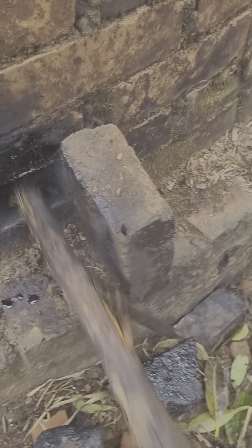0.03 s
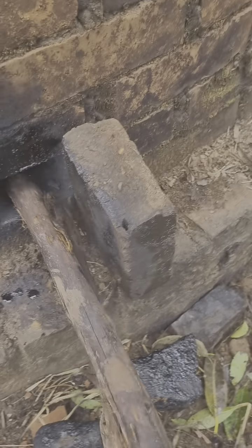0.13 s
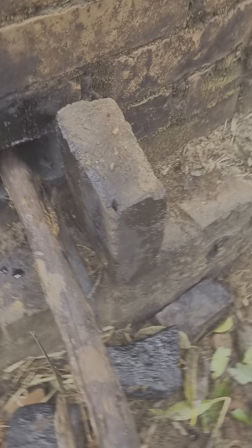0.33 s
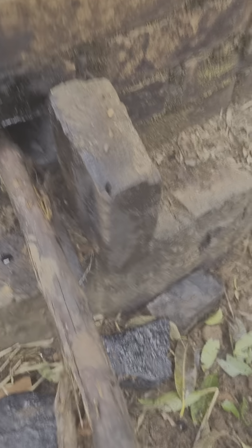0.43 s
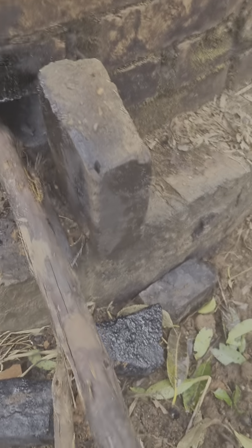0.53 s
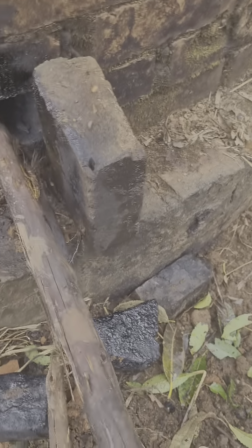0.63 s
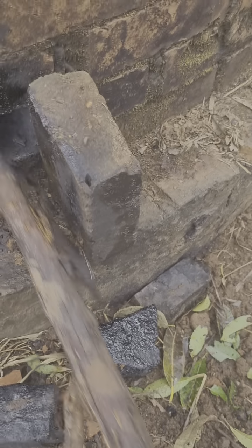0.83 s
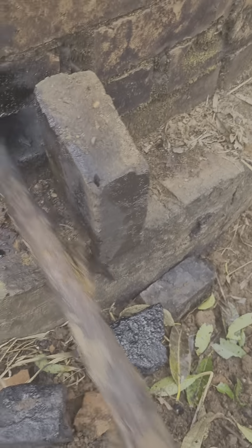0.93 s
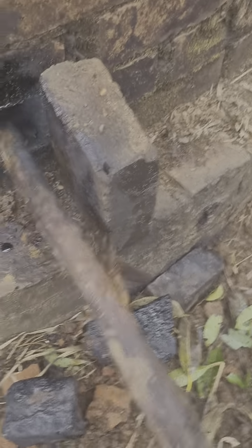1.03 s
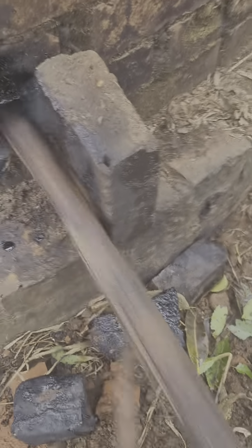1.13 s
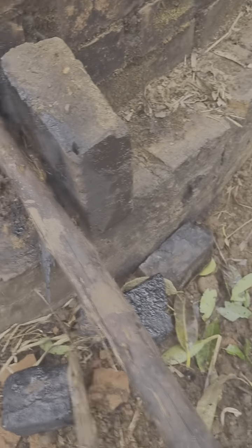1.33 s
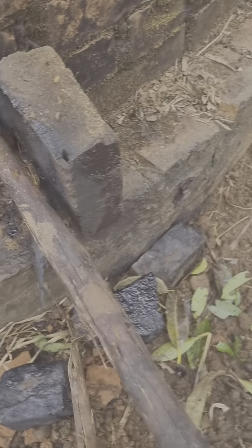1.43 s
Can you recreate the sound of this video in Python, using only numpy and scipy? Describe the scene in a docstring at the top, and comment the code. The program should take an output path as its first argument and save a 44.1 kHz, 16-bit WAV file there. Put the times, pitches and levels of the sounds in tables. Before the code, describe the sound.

A wooden pole knocks against brick twice, about a second apart, each a dry crack with a short woody ring. Its tip faintly scrapes and snaps grit around the blows, over soft handling bumps and quiet outdoor hiss.

```python
"""Two knocks of a wooden pole on brick

Each impact gives a dry crack and excites the pole's damped modes, a short woody ring; wall and ground
scatter the sound back. Around the blows the hand-held tip scrapes over the brick and snaps bits of grit.
Soft handling bumps, scuffs and a faint outdoor hiss lie underneath."""
import sys
import numpy as np
from scipy import signal
from scipy.fft import rfft, irfft
from scipy.io import wavfile
from scipy.ndimage import uniform_filter1d

SR = 44100
rng = np.random.default_rng(int(sys.argv[2]) if len(sys.argv) > 2 else 0)


def master_out(mix):
    """Clip the mix to full scale and print it as 16-bit PCM to the path in sys.argv[1]."""
    frames = np.transpose(np.atleast_2d(mix))
    ceiling = np.clip(frames, -1, 1)
    pcm = np.round(ceiling * 32767).astype(np.int16)
    wavfile.write(sys.argv[1], SR, pcm)


N = 66150

# Phase between the microphone ports. Each row: frequency in Hz, lead of the left in radians.
PORT_LEAD = [(100, .15), (450, 0.58), (760, 0), (900, -2.45), (1300, -2.5), (1700, -4.5), (2100, -6),
             (2500, -4), (3100, -8.5), (4000, -8.5), (4700, -7.5), (6000, -6.5), (7000, -5.5), (15000, -5)]


def amp(db):
    """Amplitude grows tenfold for every 20 dB."""
    return 10 ** (np.asarray(db) / 20)


def unit(x):
    """Normalisation to an rms of 1."""
    return x / np.sqrt(np.mean(x ** 2) + 1e-20)


def read(points, hz):
    """Interpolation on a logarithmic frequency axis."""
    f, value = np.transpose(points)
    return np.interp(np.log(hz + 1), np.log(f), value)


def add(mix, start, sound):
    """Superposition of a stereo sound, from a start in seconds."""
    part = mix[:, max(round(start * SR), 0):][:, :sound.shape[1]]
    part += sound[:, :part.shape[1]]


def clock(size=8192):
    """Uniform sampling times in seconds."""
    return np.arange(size) / SR


def fade(t, t60):
    """Exponential decay, by 60 dB in t60 seconds."""
    return np.exp(-np.log(1000) * np.maximum(t, 0) / t60)


def panned(side_db):
    """A level difference, split evenly between left and right."""
    return amp(np.array([[.5], [-.5]]) * side_db)


def colour(x, spectrum, correlation, balance, lead=None):
    """Partial coherence: two independent signals are blended and filtered into a stereo pair."""
    hz = np.fft.rfftfreq(x.shape[1], 1 / SR)
    left, independent = rfft(x)
    shared = np.clip(read(correlation, hz), -1, 1)
    turn = np.exp(-1j * read(lead, hz)) if lead else 1
    right = shared * left * turn + np.sqrt(1 - shared ** 2) * independent
    pair = np.array([left, right]) * panned(read(balance, hz))
    return unit(irfft(pair * amp(read(spectrum, hz)) * (hz > 15), x.shape[1]))


def near_pole(x, spectrum):
    """Sound from near the pole reaches the two ports with differences of level and phase."""
    # Each row: frequency in Hz, left-right correlation.
    correlation = [(100, 0.85), (450, 0.85), (1000, 0.45), (2500, 0.38), (5000, 0.54), (8000, 0.19),
                   (15000, 0.15)]
    # Each row: frequency in Hz, left over right in dB.
    balance = [(100, 13), (400, -1), (1200, -0.5), (2400, -2), (4400, -1.5), (8000, 2.5), (15000, -4.5)]
    return colour(x, spectrum, correlation, balance, PORT_LEAD)


def noise(spectrum, tilt_db=0, size=8192):
    """Filtered Gaussian noise from near the pole, tilted by tilt_db per octave."""
    tilted = [(hz, db + tilt_db * np.log2(hz)) for hz, db in spectrum]
    return near_pole(rng.standard_normal((2, size)), tilted)


def outdoor_air():
    """Ambient noise: weakly coherent hiss and rumble, gently uneven in time and frequency."""
    # Each row: frequency in Hz, spectral density in dB.
    spectrum = [(25, -11.5), (60, -1), (110, -3), (200, -14.5), (400, -11.5), (750, -16), (1200, -19.5),
                (2500, -22), (5500, -23), (7500, -28.5), (10000, -30.5), (13000, -29), (15500, -35)]
    # Each row: frequency in Hz, left-right correlation.
    correlation = [(60, -0.16), (130, -0.17), (300, 0.49), (640, 0.42), (1400, -0.16), (3000, 0.072),
                   (15000, -0.099)]
    # Each row: frequency in Hz, left over right in dB.
    balance = [(60, -7.5), (200, -3), (500, -0.5), (5000, 1), (15000, -5)]
    level_db, patch_db = -48.5, 1.5
    hiss = colour(rng.standard_normal((2, N)), spectrum, correlation, balance)
    bands = signal.stft(hiss, nperseg=1024)[2]
    patches = uniform_filter1d(rng.standard_normal(bands.shape[1:]), size=16, axis=0)
    patches = unit(uniform_filter1d(patches, size=8, axis=1))
    return amp(level_db) * unit(signal.istft(bands * amp(patch_db * patches))[1][:, :N])


def handling():
    """Handling noise: each shift of grip gives a low tone pulse and a rub of sleeve and hand."""
    # Each row: centre in seconds, level in dB, frequency in Hz, half length in seconds.
    bumps = [(0.024, -41, 59, 0.036), (0.072, -44, 110, 0.0076), (0.139, -36.5, 100, 0.011),
             (.201, -37, 141, 0.004), (0.264, -33.5, 92, 0.0041), (0.4, -37.5, 71, 0.0094),
             (.429, -35.5, 69.5, .012), (0.469, -35.5, 75, 0.013), (0.524, -42, 88, 0.0088),
             (0.653, -45, 80, 0.023), (0.974, -54.5, 74.4, 0.014), (1.034, -34, 75.4, 0.0092),
             (1.085, -38, 66, 0.006), (1.233, -43.5, 58, 0.029), (1.278, -40.5, 81, 0.015),
             (1.314, -45.5, 65, 0.009), (1.349, -37, 92, 0.0081), (1.45, -44, 88, .015),
             (1.49, -42, 45.4, 0.018)]
    # Each row: frequency in Hz, spectral density in dB.
    rub = [(25, 12), (60, -5.5), (150, 2.5), (300, -10), (600, -20), (1500, -16.5), (6000, -33)]
    t, thuds, effort = clock(N), np.zeros(N), np.zeros(N)
    for centre, db, hz, half_length in bumps:
        swell = amp(db) * np.exp(-((t - centre) / half_length) ** 2)
        thuds += swell * np.cos(2 * np.pi * hz * (t - centre))
        effort += swell
    return thuds + amp(-6) * effort * noise(rub, size=N)


def friction(length, db, spectrum):
    """Stick-slip friction: dense tiny slips swell and fade as two surfaces drag."""
    slips_per_s, spread_db = 5000, 2.5
    t = clock()
    shape = (2, len(t))
    slips = (rng.random(shape) < slips_per_s / SR) * rng.choice([-1, 1], shape)
    strength = amp(spread_db * np.minimum(rng.exponential(1, shape), 4))
    swell = np.sqrt(abs(np.sin(np.pi * np.minimum(t / length, 1))))
    return amp(db) * near_pole(slips * strength, spectrum) * swell


def hand_scuffs(mix):
    """Sliding friction of the pole in the hands makes a dull rub."""
    # Each row: start in seconds, length in seconds, level in dB.
    scuffs = [(0.113, 0.017, -44), (1.014, 0.059, -47.5), (1.06, 0.046, -49.5), (1.238, 0.054, -46.5)]
    # Each row: frequency in Hz, spectral density in dB.
    spectrum = [(60, 2), (170, -2), (300, 2), (450, -2), (700, -13), (1200, -15), (5000, -57)]
    for start, length, db in scuffs:
        add(mix, start, friction(length, db, spectrum))


def tip_scrapes(mix):
    """Sliding friction of wood on brick makes a broadband rasp."""
    # Each row: start in seconds, length in seconds, level in dB.
    scrapes = [(0.107, 0.03, -45.5), (0.174, 0.06, -47.5), (0.227, 0.06, -47), (1.153, 0.024, -48.5),
               (1.194, 0.026, -42), (1.228, 0.014, -39), (1.25, 0.073, -51), (1.281, 0.068, -48.5)]
    # Each row: frequency in Hz, spectral density in dB.
    spectrum = [(150, 8), (400, 2.5), (850, 8), (1200, -3), (2200, 1.5), (2900, -4.5), (3800, 3),
                (6200, -5.5), (7500, -14), (10000, -13.5), (12500, -11), (15500, -11)]
    for start, length, db in scrapes:
        add(mix, start, friction(length, db, spectrum))


def grit_ticks(mix):
    """Brittle fracture: grit snaps under the tip, a broad click with one resonance and a faint tail."""
    # Each row: start in seconds, level in dB, resonance in Hz, its level over the click in dB,
    # click tilt in dB per octave.
    ticks = [(0.1352, -42.5, 6230, -3.5, -3), (0.2357, -47, 4960, -12, 5), (0.6645, -54, 14000, -8, 3),
             (1.1564, -36.5, 3510, -0.5, -4.5), (1.2913, -38, 7830, -3, 2.5),
             (1.3238, -49.5, 3570, 8.5, -4), (1.338, -50.5, 12500, -10, 9)]
    # Each row: frequency in Hz, spectral density in dB.
    click = [(500, -29), (1200, -9), (2800, -12), (4000, 10), (6000, -6), (8000, -7), (11000, -5.5),
             (15500, -10)]
    rise_s, edge_ratio = 0.00092, 2 ** 0.2
    t = clock()
    envelope = np.minimum(t / rise_s, 1) * (fade(t, t60=0.013) + amp(-8) * fade(t, t60=0.098))
    for start, db, hz, ring_db, tilt_db in ticks:
        ring = noise([(hz / edge_ratio, -30), (hz, 0), (hz * edge_ratio, -30)])
        snap = noise(click, tilt_db) + amp(ring_db) * ring
        add(mix, start, amp(db) * snap * envelope)


def scatter():
    """Diffuse reflection from wall and ground: a short tail in which each band decays at its own rate."""
    # Each row: frequency in Hz, spectral density in dB.
    spectrum = [(100, -4), (330, -3), (600, 3), (800, 8.5), (1100, -5), (2100, -1), (2900, -12.5),
                (3700, -5), (6000, -6.5), (7500, -16.5), (10000, -24), (12500, -15.5), (15500, -23)]
    # Each row: frequency in Hz, T60 in seconds.
    decay_times = [(150, 0.35), (400, 0.16), (1000, 0.073), (2500, 0.18), (6000, 0.11), (12000, 0.099)]
    delay_s, rise_s = 0.0025, 0.0066
    hz, t, bands = signal.stft(noise(spectrum), SR, nperseg=256)
    tail = signal.istft(bands * fade(t - delay_s, read(decay_times, hz)[:, None]), SR)[1]
    return tail * np.clip((clock(tail.shape[1]) - delay_s) / rise_s, 0, 1)


def wall_reflection(direct):
    """Specular reflection: the wall returns one weaker, duller copy."""
    return amp(-16) * signal.lfilter(*signal.butter(2, (630, 950), "band", fs=SR), direct)


def crack(tilt_db):
    """Contact noise: the tip crushes on the brick in a brief broadband burst."""
    # Each row: frequency in Hz, spectral density in dB.
    spectrum = [(150, 0), (500, -19), (1000, -9), (1500, -1.5), (2300, 4.5), (2900, -21), (3600, 0.5),
                (4400, -4), (6000, -4), (7400, -7.5), (9500, -14.5), (12000, -7), (15500, -9)]
    rise_s, hold_s = 0.00046, 0.0018
    t = clock()
    return noise(spectrum, tilt_db) * np.minimum(t / rise_s, 1) * fade(t - hold_s, t60=0.024)


def pole_ring(blow, damping):
    """Modal vibration: the spot struck sets each mode's level, and pressing on the brick adds damping."""
    # Each row: frequency in Hz, T60 in seconds, left over right in dB, level in dB in each of two blows.
    modes = [(142, 0.029, 8, -14.5, -29), (197, 0.049, 1, -14, -10.5), (289.5, 0.13, 0, -24, -14.5),
             (380, 0.052, 3, -13, -37), (411.6, 0.072, 0.5, -20, -14), (518.4, 0.0315, -4, -21.5, -18.5),
             (614, 0.037, 2, -24, -26), (761, 0.053, 0, -21.5, -33), (849, 0.084, -7, -25, -41),
             (1230, 0.019, 7, -24, -21.5), (1922, 0.02, -8.5, -41, -17), (2038, 0.057, -10.5, -30.5, -47),
             (3430, 0.022, -4, -30, -21), (3880, 0.017, -15, -23.5, -49)]
    rise_s, rise_cycles = 0.00049, 0.41
    t, ring = clock(), 0
    for hz, t60, side_db, *levels_db in modes:
        rise = np.minimum(t / (rise_s + rise_cycles / hz), 1)  # low modes build up more slowly
        lead = np.array([[.5], [-.5]]) * read(PORT_LEAD, hz)
        mode = rise * fade(t, t60) * np.sin(2 * np.pi * hz * t + lead)
        ring += amp(levels_db[blow]) * panned(side_db) * mode
    return ring * np.exp(-damping * t)


def knocks(mix):
    """Impact excitation: each blow sends out a crack and a ring, followed by reflections."""
    # Each row: start in seconds, ring level in dB, crack level in dB, crack tilt in dB per octave,
    # scatter level in dB, extra damping in 1/s.
    blows = [(.1536, 0.5, -20.5, -2, -27, 3), (1.2046, 0, -25, 0.9, -32, 101)]
    echo_delay_s = 0.017
    for blow, (start, ring_db, crack_db, tilt_db, scatter_db, damping) in enumerate(blows):
        direct = amp(crack_db) * crack(tilt_db) - amp(ring_db) * pole_ring(blow, damping)
        knock = direct + amp(scatter_db) * scatter()
        add(knock, echo_delay_s, wall_reflection(direct))
        add(mix, start, knock)


def scene():
    """Superposition of knocks, ticks, scrapes and scuffs on handling noise and outdoor air."""
    mix = outdoor_air() + handling()
    knocks(mix)
    grit_ticks(mix)
    tip_scrapes(mix)
    hand_scuffs(mix)
    return mix


def record(dry):
    """Band limiting: the microphone sheds deep bass, and a low-pass filter removes the highest treble."""
    low_cut_hz, high_cut_hz = 24, 15900
    thinned = signal.lfilter(*signal.butter(1, low_cut_hz, "high", fs=SR), dry)
    low_pass = signal.firwin(511, high_cut_hz, window=("kaiser", 8), fs=SR)
    return signal.oaconvolve(thinned, low_pass[None], "same")


dry = scene()
out = record(dry)
master_out(out)
```